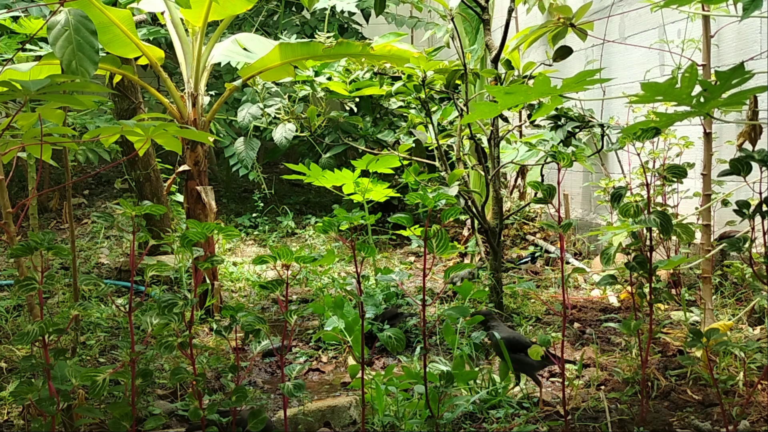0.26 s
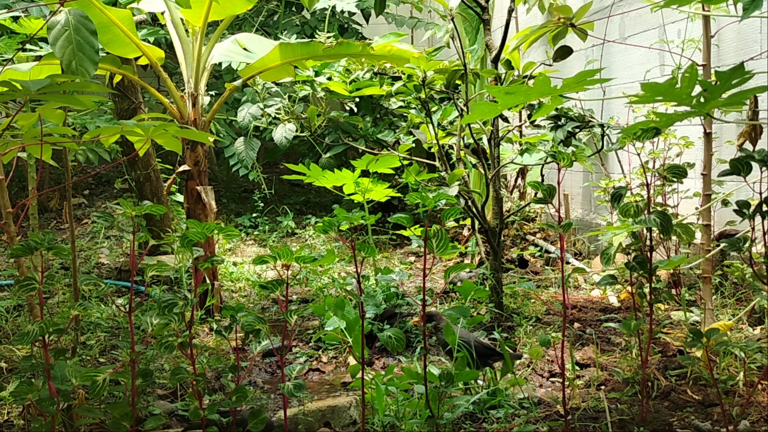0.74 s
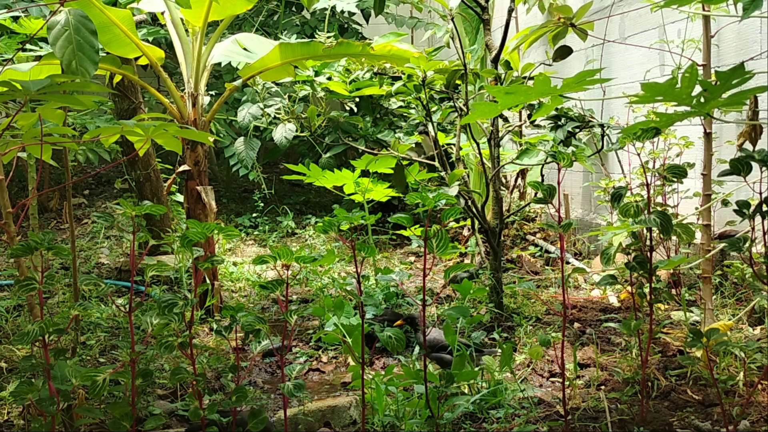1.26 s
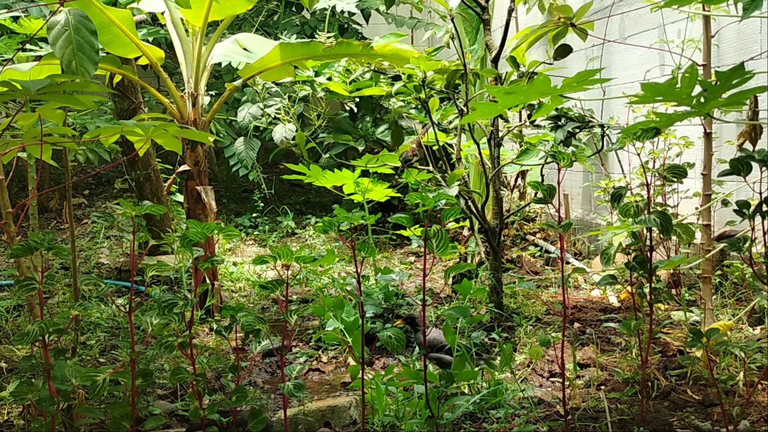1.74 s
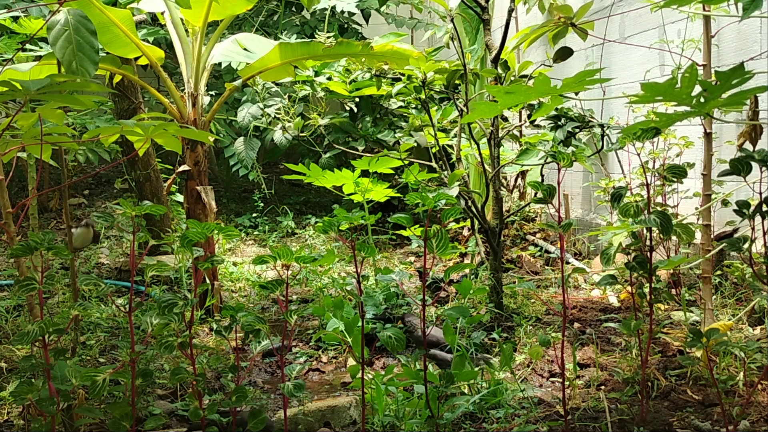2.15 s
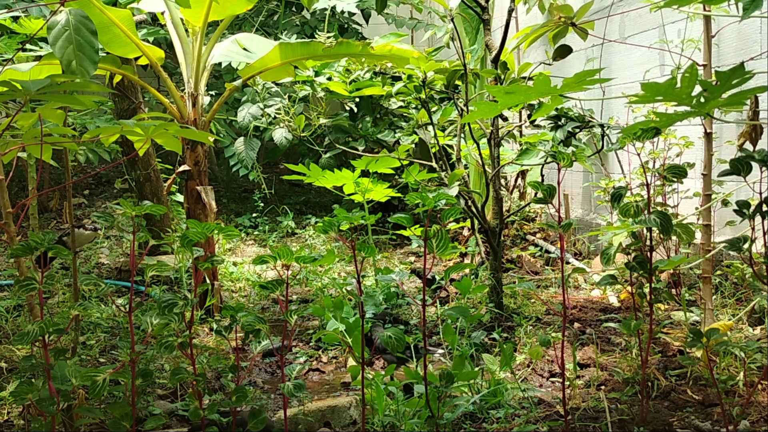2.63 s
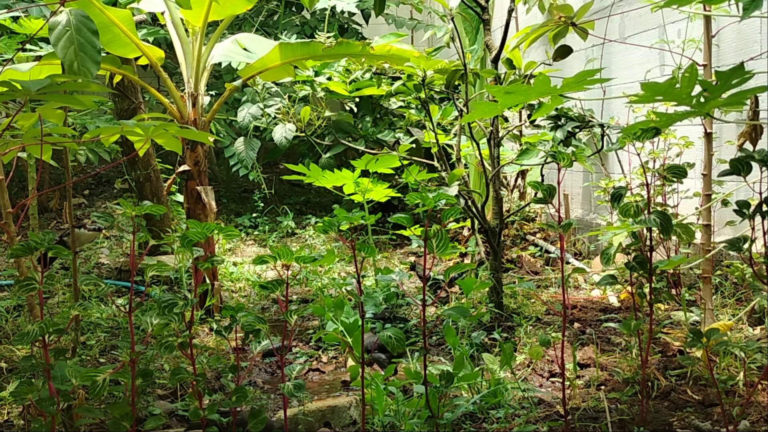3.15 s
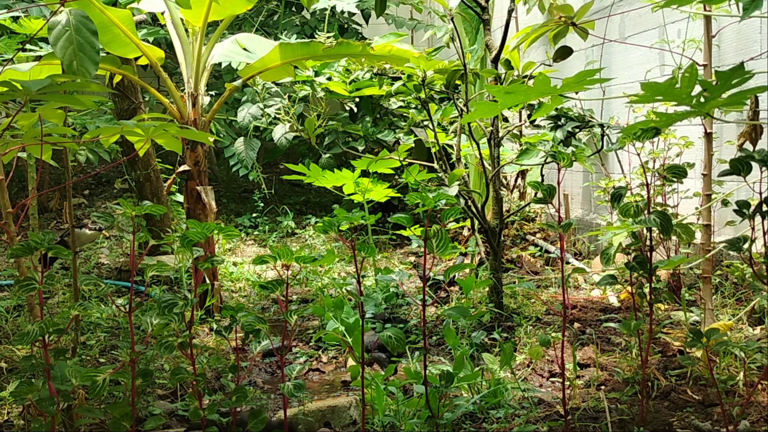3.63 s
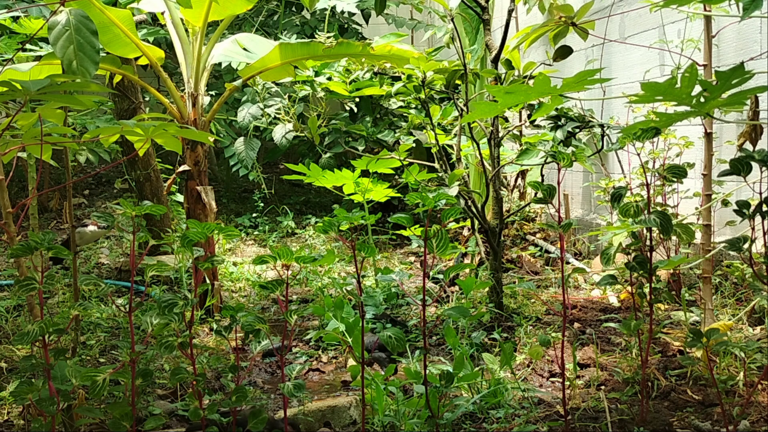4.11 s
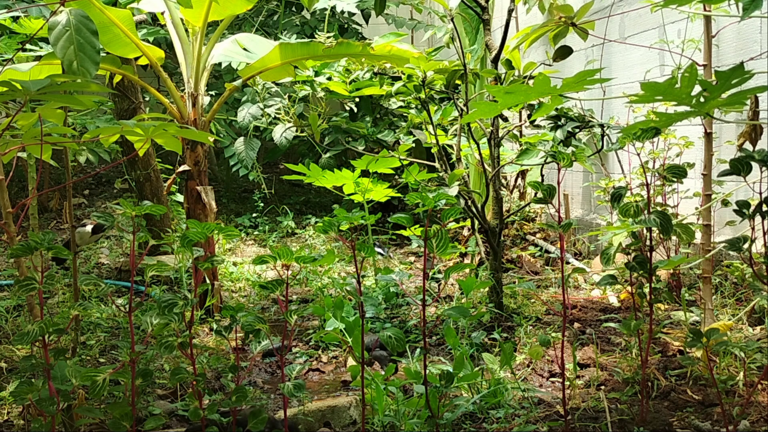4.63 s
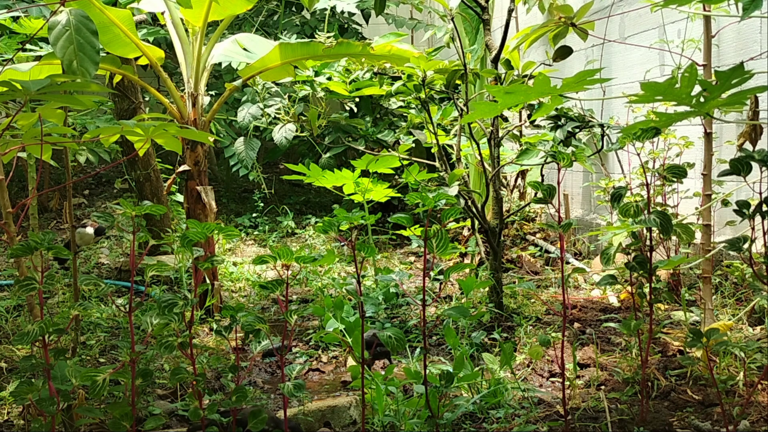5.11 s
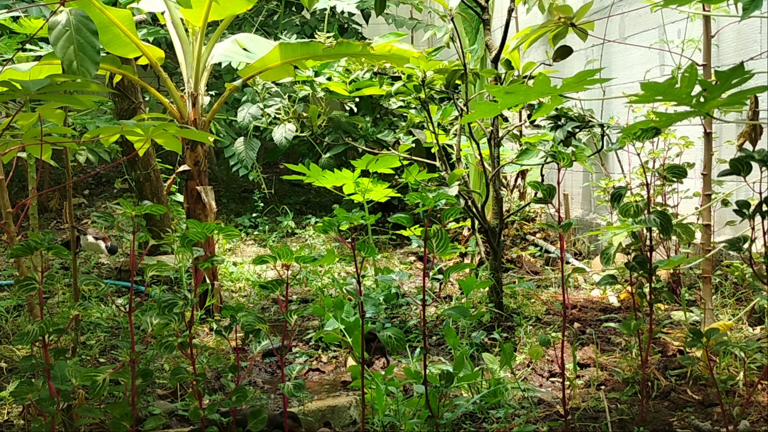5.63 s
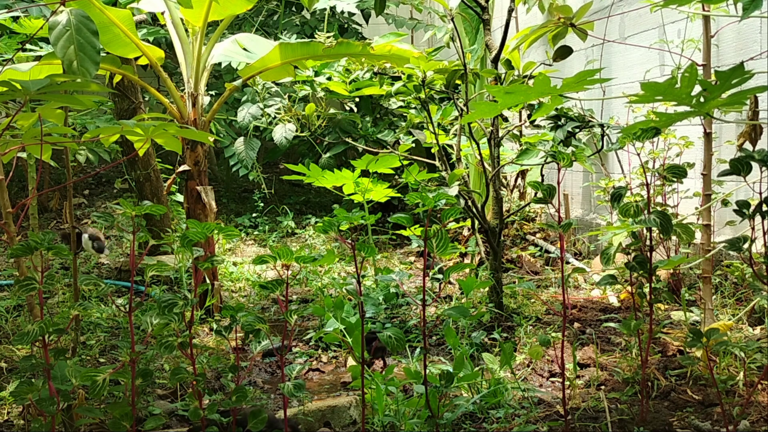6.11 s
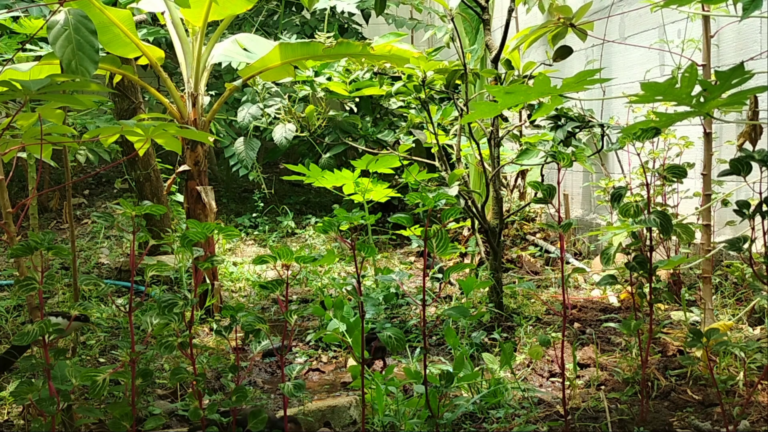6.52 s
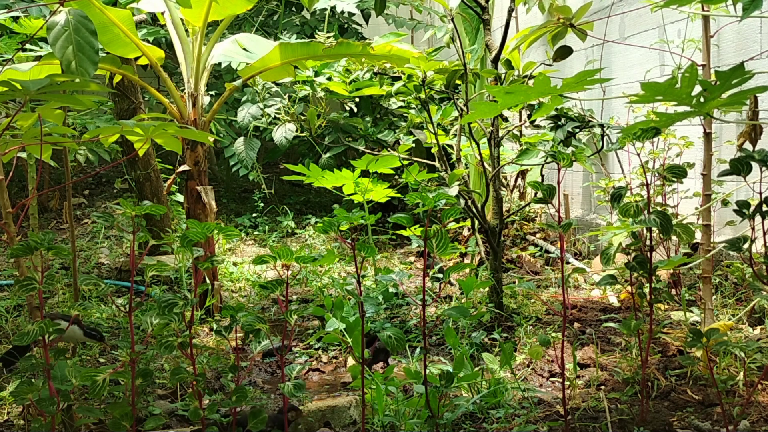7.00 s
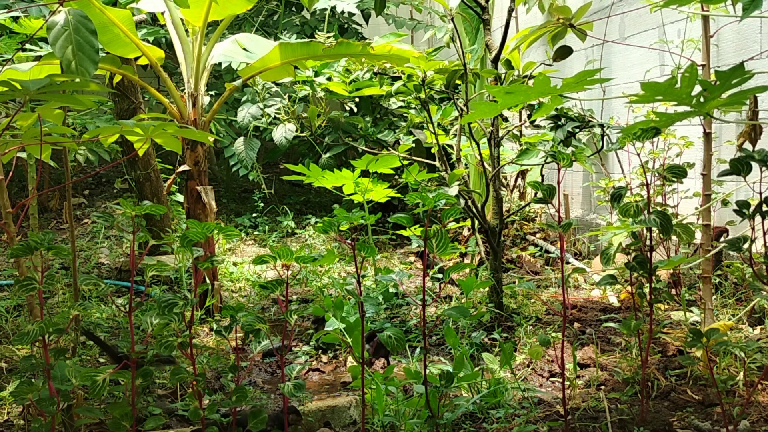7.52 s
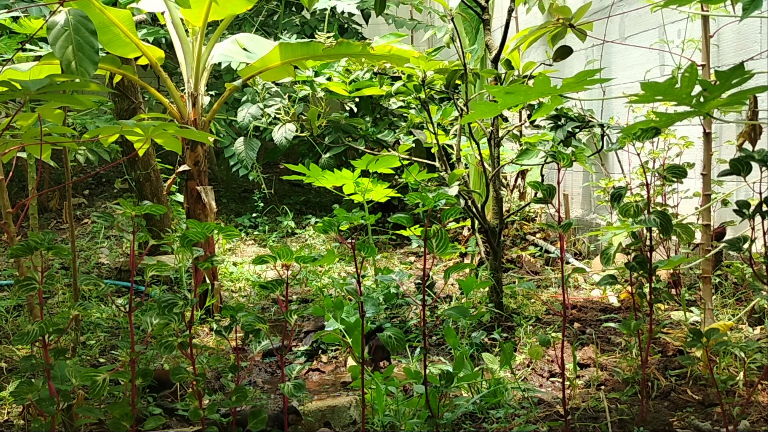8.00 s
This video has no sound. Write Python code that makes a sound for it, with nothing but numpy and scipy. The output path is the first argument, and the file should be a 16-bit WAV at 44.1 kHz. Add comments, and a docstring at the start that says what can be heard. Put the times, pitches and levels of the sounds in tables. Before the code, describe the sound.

A single microphone in a leafy walled garden hears steady, echoing metal blows from somewhere hidden. A quick far yelp opens, then dry leaves crackle and a nearby bird chirps. Two dull knocks sound further away, a low engine drone rises and falls, and a rough-voiced bird warbles, most strongly as the hammering stops. Three looser blows, rustling and a final short warble end it over faint air hiss.

```python
"""A leafy garden: hammering on metal, out of sight in a walled yard, arrives as washes of echo about twice a second.
A far animal yelps at once and again after two seconds; leaves rustle and a near bird chirps, then chirps softly.
From two seconds a hoarse bird warbles in bursts, two dull knocks come from further off and an engine drone swells.
The blows pause, then a few more follow, with late rustles and a last warble, all under the hiss of open air.
Blows are noise echoes ringing in metal modes; calls are gliding harmonics; leaves, traffic and air are shaped noise."""
import sys
import numpy as np
from scipy import signal
from scipy.fft import rfft, irfft
from scipy.io import wavfile

SR = 44100
rng = np.random.default_rng(int(sys.argv[2]) if len(sys.argv) > 2 else 0)


def pcm_store(signal):
    """Save signal as 16-bit PCM."""
    levels = np.round(np.clip(np.atleast_2d(signal), -1, 1) * 32767)
    wavfile.write(sys.argv[1], SR, levels.astype(np.int16).T)


N = 364266

# ringing modes of the struck metal: mode_hz, level_db (relative), t60_s (under a square blow)
METAL_MODES = [(611, -20, 0.33), (737, -13, 0.085), (873, -11.5, 0.075), (1142, -10, 0.06),
               (1314, -21, 0.15), (1397, -12, 0.094), (1496, -13.5, 0.12), (1702, -8.5, 0.087),
               (1832, -7, 0.079), (2004, -11.5, 0.097), (2196, -15, 0.09), (2366, -15, 0.063),
               (2526, -9, 0.033), (2540, -18, 0.072), (2830, -20.5, 0.065), (2810, -13, 0.055),
               (3050, -33.5, 0.12), (3186, -33, 0.088), (3420, -38, 0.09), (3700, -17, 0.071),
               (3730, -17, 0.08), (3930, -12, 0.046), (4207, -9.5, 0.028), (4400, -13, 0.031),
               (4620, -3, 0.089), (7300, -14.5, 0.096), (8420, -6, 0.0031), (13000, -25, 0.1)]


def from_db(db):
    """Gain of a level in dB."""
    return 10 ** (np.asarray(db) / 20)


def rms_one(x):
    """Scaled to an rms of 1."""
    return x / np.sqrt(np.mean(x ** 2) + 1e-20)


def in_time(rows, t):
    """Columns of a curve table, read at times t."""
    s, *columns = np.transpose(rows)
    return [np.interp(t, s, column) for column in columns]


def at_hz(points, hz):
    """A spectrum in dB, or a decay time, read on a log-frequency axis."""
    point_hz, values = np.array(points).T
    return np.interp(np.log(hz + 1), np.log(point_hz), values)


def coloured(x, spectrum, tilt_db=0):
    """x shaped by a spectrum and a tilt, in dB per octave in the treble, about 1.5 kHz; rms 1."""
    hz = np.fft.rfftfreq(len(x), 1 / SR)
    shape_db = at_hz(spectrum, hz) + tilt_db * np.log2((hz + 500) / 2000)
    return rms_one(irfft(rfft(x) * from_db(shape_db), len(x)))


def noise(spectrum, size):
    """White noise given a spectrum; rms 1."""
    return coloured(rng.standard_normal(size), spectrum)


def drift(rate_hz, size):
    """Slow random wander of rms 1: noise through two equal low-pass poles, after a second to settle."""
    r = np.exp(-2 * np.pi * rate_hz / SR)
    return rms_one(signal.lfilter([1], [1, -2 * r, r * r], rng.standard_normal(size + SR))[SR:])


def add(out, x, s):
    """Mix x into out from time s, which may lie before the start."""
    i = round(s * SR)
    x = x[max(-i, 0):N - i]
    out[max(i, 0):max(i, 0) + len(x)] += x


def hammer():
    """A hammer on metal: a broad crack plus ringing modes, heard only by way of the yard's echoes."""
    # blows: start_s, level_db, changes near 1.69, 1.85, 2.0 and 4.6 kHz: ring_1_db to ring_4_db,
    # clang near 2.5 and 3.6 kHz: mid_db, high_db, two favoured modes: mode_1_hz, mode_2_hz, their lift_db,
    # edge (0 square, 1 right on the edge), tilt_db_per_octave, fade_db_per_s (beyond the yard's decay)
    blows = [(0.0, -53, 2, 1, -6, -6, -9, -5.5, 3400, 2900, 5, 0.045, -2, 9),
             (0.447, -51, 5, -3, 11, -4, -3.5, -4, 2170, 3700, 8.8, 0.011, -2, 6),
             (0.876, -50.5, -1, -16, 15, -22, -7.5, -2, 3700, 4390, 3.9, 0, 1.5, -18.5),
             (1.333, -49, 10, -18, -6, -8, -4.5, 2.7, 3400, 3580, 10, 0.093, -1, 6.5),
             (1.791, -50.5, -14, 10.5, -1, -10, -5, -1, 3700, 3230, 6.6, 0.059, 0.6, -3),
             (2.24, -50.5, 11, 12.5, 10, 4.5, 0.5, 5.5, 3580, 3940, 8, 0.79, 0.1, 4),
             (2.73, -48, -16, -1, 8.5, -8, -6.5, -2.3, 3080, 2360, 13, 0.083, 0.3, -7.5),
             (3.216, -50, 9.5, -5, 7, -14, -8.5, -0.2, 3580, 3080, 8, 0, 1.1, -2),
             (3.702, -50.5, -5, 15.5, -9, -3, -2.5, 2.5, 2840, 3700, 8, 0.22, 0.6, -16.5),
             (4.151, -50, 12, 10.5, -10, -16, -5, 1.5, 3580, 2520, 8, 0.11, 1.2, 10),
             (4.615, -50, 13.5, 8.5, 8, -5.5, -5, 6, 3230, 3940, 6.2, 0.43, 0, 2),
             (6.234, -54, 14, -31, -12, -9, 1.5, -7.5, 2900, 2170, 11, 0.00089, 2, 3),
             (6.618, -50.5, 12.5, 5, -8, -16, -2.5, -0.5, 3940, 2360, 6.8, 0.099, 1.7, 16),
             (7.066, -53, 4.5, -20, -15, -3, -3, -0.5, 3940, 2900, 7.5, 0, 2.9, 1),
             (7.989, -58, -7, 2, -6, 2.5, 6, -14, 2360, 2840, 4, 0.02, 7, 48)]
    # colour of the crack: freq_hz, level_db (relative)
    crack_colour = [(210, -43), (350, -29), (506, -30.5), (754, -6.5), (990, -8), (1140, -16), (1240, -9),
                    (1550, -4.5), (1750, 0.5), (2500, -8.5), (3500, -5.5), (5660, -19.5), (8570, -24),
                    (11300, -36.5), (16000, -24.5)]
    thud_db, ring_db, clang_db = 5.5, -3.5, -1.5  # groups of modes under a square blow
    edge_thud_db, edge_clang_db, edge_sizzle_db = -43, -15.5, -18  # change for a blow right on the edge
    edge_longer = 1.7  # added share of the highest rings' length, right on the edge
    crack_follows = 0.47  # share of a clang's change that the crack takes on
    out, hz = np.zeros(N), np.array(METAL_MODES)[:, 0]
    # each mode belongs to the first group that fits; the rest belong to the high clang
    groups = [hz < 1250, hz < 1600, hz < 1780, hz < 1910, hz < 2080, abs(hz - 4625) < 200, hz < 2920]
    for s, db, *rings_db, mid_db, high_db, hz1, hz2, lift_db, edge, tilt_db, fade_db in blows:
        echoes = yard(rise_s=0.0021, wall_s=.008)
        group_db = [thud_db + edge * edge_thud_db, ring_db, *rings_db, clang_db + mid_db]
        levels_db = np.select(groups, group_db, clang_db + high_db + edge * edge_clang_db)
        levels_db = levels_db + rng.normal(0, 3.2, len(hz))
        favoured = [np.argmin(abs(hz - hz1)), np.argmin(abs(hz - hz2))]
        levels_db[favoured] += lift_db
        crack = []
        for f, level_db in crack_colour:
            clang_change_db = mid_db * (2000 < f < 3000) + high_db * (3000 < f < 5000)
            sizzle_db = edge * edge_sizzle_db * (f > 10000)
            crack.append((f, level_db + sizzle_db + crack_follows * clang_change_db))
        ringing = struck(echoes, levels_db, edge * edge_longer)
        blow = coloured(echoes, crack, tilt_db) + from_db(-11.0) * ringing
        fading = from_db(db - fade_db * np.arange(len(blow)) / SR)
        add(out, fading * blow, s)
    return out


def struck(echoes, levels_db, longer=0):
    """Echoes ringing in the metal: each mode is a decaying sine, brought to its own level."""
    spectrum, hz, out = rfft(echoes), np.fft.rfftfreq(len(echoes), 1 / SR), 0
    for (mode_hz, db, t60), more_db in zip(METAL_MODES, levels_db):
        decay = np.log(1000) / t60 / (1 + longer * (mode_hz > 4500))  # per s
        ringing = spectrum / (decay + 2j * np.pi * (hz - mode_hz))
        out = out + from_db(db + more_db) * ringing / np.linalg.norm(ringing)
    return irfft(out, len(echoes)) * len(echoes) / np.sqrt(2)


def yard(rise_s, wall_s=0.):
    """Echoes of walls and trees: noise builds up, 3 dB down until the nearest wall answers, then dies; energy 1."""
    # decay of the yard: freq_hz, t60_s
    yard_decay = [(400, 0.75), (1000, 0.66), (2800, 0.48), (7000, 0.51), (15000, 0.24)]
    t = np.arange(SR * 2 // 3) / SR
    white, hz = rfft(rng.standard_normal(len(t))), np.fft.rfftfreq(len(t), 1 / SR)
    octave = np.clip(np.log2(hz / 250 + 1e-9), 0, 6)  # above 250 Hz
    echoes = np.zeros(len(t))
    for k in range(7):
        band = irfft(white * np.clip(1 - abs(octave - k), 0, 1), len(t))  # bands overlap and sum to the whole
        echoes += band * from_db(-60 * t / at_hz(yard_decay, 250 * 2 ** k))
    echoes *= 1 - np.exp(-t / rise_s)
    echoes *= np.where(t < wall_s, from_db(-3.0), 1)
    echoes *= from_db(0.92 * drift(83, size=len(t)))
    return echoes / np.sqrt(np.sum(echoes ** 2))


def knocks():
    """Dull knocks further off: metal modes that grow weaker with pitch, in slower-rising echoes."""
    # knocks: start_s, level_db (rms over the whole tail)
    far_knocks = [(2.639, -66.5), (3.921, -70)]
    out, hz = np.zeros(N), np.array(METAL_MODES)[:, 0]
    dulled_db = -8.5 * np.log2(hz / 800)  # -8.5 dB per octave
    for s, db in far_knocks:
        add(out, from_db(db) * rms_one(struck(yard(rise_s=0.012), dulled_db)), s)
    return out


def warble():
    """A hoarse bird: short gliding notes of two harmonics, roughened by fast pitch flutter."""
    # notes: start_s, length_s, start_hz, end_hz, level_db (before throat and distance)
    notes = [(2.058, 0.026, 2850, 2890, -59), (2.095, 0.039, 2760, 2880, -51),
             (2.123, 0.028, 3240, 2900, -54), (2.142, .03, 2850, 2780, -52), (2.175, .035, 2490, 2500, -54),
             (3.478, 0.018, 2780, 2800, -51), (3.488, 0.017, 2600, 2200, -49),
             (3.509, 0.024, 3130, 3230, -49.5), (3.52, .024, 2830, 2850, -50),
             (3.548, 0.047, 2760, 2410, -51), (3.89, 0.035, 2295, 2450, -46), (3.921, .03, 2760, 2480, -49),
             (3.958, 0.035, 2575, 3030, -47), (3.978, .03, 2620, 2830, -45.5),
             (4.014, 0.058, 2820, 2520, -75), (5.153, 0.025, 2030, 2210, -54.5),
             (5.176, 0.018, 1905, 2500, -49), (5.194, 0.029, 2310, 1860, -54),
             (5.219, 0.029, 2270, 2570, -48.5), (5.239, 0.041, 3200, 2840, -50),
             (5.279, 0.048, 2610, 2474, -51), (5.468, 0.047, 2400, 1850, -52.5),
             (5.495, 0.031, 2500, 2850, -54.5), (5.518, 0.043, 2356, 1900, -46),
             (5.527, 0.027, 3270, 3050, -47), (5.563, 0.031, 2745, 2420, -41),
             (5.589, 0.0358, 2497, 2980, -41), (5.618, 0.053, 2900, 2505, -45),
             (5.685, 0.027, 2255, 2140, -48.5), (5.675, 0.034, 4030, 4800, -40),
             (5.697, .04, 4060, 4070, -49), (5.705, 0.04, 3140, 3370, -50),
             (5.742, 0.0322, 2970, 2297, -42), (5.768, .042, 3190, 2875, -42.5),
             (5.806, 0.032, 2554, 2485, -44), (5.83, 0.066, 2800, 2830, -65), (8.04, .11, 2560, 2450, -58),
             (8.154, .032, 1874, 2030, -52.5), (8.19, 0.028, 2540, 2410, -53),
             (8.222, .036, 2790, 2840, -59)]
    glides = [[(s, hz, db), (s + length, end_hz, db)] for s, length, hz, end_hz, db in notes]
    throat = [(3400, -6.5), (3800, -21), (5000, -27.5), (6000, -33)]  # Hz, dB
    return voice(glides, throat, count=2, hoarse=0.049, flutter_hz=230, breath_db=2.5,
                 dry_db=-5.0, wet_db=-3.0, fade_db=94)


def chirp():
    """A near bird: two chirps whose two harmonics follow a bending pitch, with little echo."""
    # near chirp: time_s, pitch_hz, level_db (before throat and distance)
    near_chirp = [(.36, 1784, -49), (.368, 1890, -48), (.3745, 2310, -48), (.379, 1860, -44),
                  (.384, 1865, -46), (.393, 1970, -54)]
    # softer chirp: time_s, pitch_hz, level_db (before throat and distance)
    soft_chirp = [(1.724, 1760, -65), (1.741, 2330, -56), (1.749, 2470, -58), (1.776, 2280, -65)]
    throat = [(2200, 5.0), (3700, 1.0), (4400, -6)]  # Hz, dB
    return voice([near_chirp, soft_chirp], throat, count=2, hoarse=0.025, flutter_hz=330, breath_db=2.5,
                 dry_db=-1.0, wet_db=-12.0, fade_db=152)


def yelps():
    """A far animal: six harmonics glide to a held pitch, coloured by the throat."""
    # yelps: start_s, length_s, start_hz, held_hz, level_db (at the held pitch, before throat and distance)
    far_yelps = [(.006, 0.024, 396, 404, -58), (0.028, 0.064, 403.7, 615, -38.5),
                 (0.09, 0.0346, 505, 606.6, -40), (2.135, 0.041, 595, 587, -57.5),
                 (2.188, 0.02, 590, 598, -53.5), (2.3, 0.21, 595, 600, -62)]
    # resonance of the throat: freq_hz, level_db (relative)
    throat = [(300, -45), (620, -38), (800, 0), (1150, -4.5), (1400, 0), (1650, 3.5), (1850, 7),
              (2400, -34), (3100, -20), (3800, -40)]
    glide_share, start_db, end_db = .66, -9.5, -2  # share of the length spent gliding; levels at the ends
    glides = []
    for s, length, start_hz, held_hz, db in far_yelps:
        glides.append([(s, start_hz, db + start_db), (s + glide_share * length, held_hz, db),
                       (s + length, held_hz, db + end_db)])
    return voice(glides, throat, count=6, hoarse=0.02, flutter_hz=70, breath_db=3.0,
                 dry_db=-2.0, wet_db=-8.5, fade_db=2)


def voice(tables, throat, count, hoarse, flutter_hz, breath_db, dry_db, wet_db, fade_db):
    """Harmonics of a fluttering pitch, their level wavering with the breath, with the yard's echoes behind."""
    out = np.zeros(N)
    for rows in tables:
        t = np.arange(rows[0][0], rows[-1][0], 1 / SR)
        hz, db = in_time(rows, t)
        flutter = rms_one(signal.detrend(drift(flutter_hz, size=len(t))))
        phase = 2 * np.pi * np.cumsum(hz * (1 + hoarse * flutter)) / SR
        edges = np.clip(np.minimum(t - t[0], t[-1] - t) / 0.0064, 0, 1)
        harmonics = sum(from_db(at_hz(throat, k * hz)) * np.sin(k * phase) for k in range(1, count + 1))
        breath = from_db(db + breath_db * drift(83, size=len(t)))
        add(out, breath * edges * harmonics, t[0])
    echoes = yard(rise_s=0.00048)
    echoes = echoes * from_db(-fade_db * np.arange(len(echoes)) / SR)  # foliage shortens the tail, dB per s
    wet = signal.fftconvolve(out, echoes / np.linalg.norm(echoes))[:N]
    return from_db(dry_db) * out + from_db(wet_db) * wet


def rustles():
    """Birds hopping in dry leaves: noise bursts with a snap in front; the foliage stirs and snaps faintly between."""
    # rustles: start_s, level_db (after the snap), twig_db (woody part below 5 kHz), bite_db (near 4 kHz),
    # snap_height (over the burst, as a ratio), t60_s
    hops = [(0.166, -66, -6, 0.1, 1.5, .05), (0.2328, -62, 8, 0.5, 1.4, 0.041),
            (0.314, -58, 1, -5, 2.4, 0.09), (0.364, -51.5, 4.5, -4, 0.5, 0.3),
            (0.636, -50.5, 2, -0.5, 0.91, .16), (0.787, -66.5, 1, 0.1, 2.4, 0.045),
            (0.814, -62, 7, -3, 2.2, .06), (1.508, -60, 8, 2, 2.4, .08), (2.021, -66, 3, 0.1, 2.4, .05),
            (4.0866, -76, -18, 0.1, 2.4, .05), (4.7358, -56.5, 3, 0.1, 2.4, .11),
            (5.707, -63, 9, 3, 2.4, .05), (6.379, -55.5, -7, 0.1, 0.1, .13),
            (6.393, -54.5, -1, 1, 0.1, 0.28), (7.396, -63.5, -8, 0.1, 2.4, 0.11),
            (7.7737, -58, 6, -3, 3.6, 0.12), (8.118, -51.5, 1, 7.5, 2.4, 0.1),
            (8.1886, -60, 2, -3, 1.2, .07), (8.234, -57.5, 3, 0, 3.6, 0.046)]
    # colour of dry leaves: freq_hz, level_db (relative)
    leaf_colour = [(300, -62), (1200, -2), (2600, -3), (4000, 0.5), (6300, -11.5), (8600, -0.5),
                   (11500, -15.5), (14000, -15), (15700, -6)]
    # stirring foliage: time_s, level_db
    stirring = [(0, -64.5), (.35, -65), (.7, -76), (1.08, -57), (1.25, -87), (1.55, -65.5), (1.7, -87),
                (1.95, -68), (2.2, -77), (2.7, -85), (7.2, -80), (7.9, -81.5), (8.26, -64)]
    hold_s = 0.0082  # before a burst fades
    twig_dulls = .5  # dB of top lost per dB of woody low part
    snaps_per_s, snap_db, snap_t60_s = 24, 8.5, 0.037  # faint snaps: rate, greatest height over the stir, decay
    out, t = np.zeros(N), np.arange(SR // 3) / SR
    for s, db, twig_db, bite_db, height, t60 in hops:
        leaf = []
        for hz, level_db in leaf_colour:
            woody_db = twig_db * (hz < 5000) - twig_dulls * twig_db * (hz > 10000)
            leaf.append((hz, level_db + woody_db + bite_db * (3000 < hz < 5000)))
        snap = (1 + max(height, 0) * np.exp(-t / .001)) * np.minimum(t / .0003, 1)
        fading = from_db(0.6 * drift(390, size=len(t)) - 60 * np.maximum(t - hold_s, 0) / t60)
        add(out, from_db(db) * snap * fading * noise(leaf, len(t)), s)
    clicks = from_db(snap_db) * rng.random(N) * (rng.random(N) < snaps_per_s / SR)
    snaps = signal.lfilter([1], [1, -from_db(-60 / (snap_t60_s * SR))], clicks)
    stir_db = in_time(stirring, np.arange(N) / SR)[0] + 1.9 * drift(9.3, size=N)
    return out + from_db(stir_db) * (1 + snaps) * noise(leaf_colour, N)


def wavering_tone(hz, size):
    """An engine's sine, with pitch and level that wander slowly."""
    phase = 2 * np.pi * np.cumsum(hz * (1 + 0.0061 * drift(3.46, size))) / SR
    return np.sin(phase) * from_db(2.2 * drift(4.5, size))


def engines():
    """Distant traffic: a steady-pitched drone, passing firing tones, low rumble and the rush of tyres."""
    # main drone: time_s, level_db (peak, before its waver)
    drone_level = [(0.0, -73), (0.07, -72), (1.22, -76), (1.45, -61.5), (3.24, -70), (3.47, -49.5),
                   (3.54, -60), (3.8, -48), (4.07, -56.5), (4.32, -50.5), (4.71, -56.5), (4.76, -75),
                   (5.1, -61), (5.29, -78), (5.45, -57), (7.08, -63), (7.43, -70), (8.26, -53)]
    # rush of traffic: time_s, level_db
    rush_level = [(0, -59.5), (.4, -61), (1.3, -72), (2.4, -66.5), (2.8, -72), (3.1, -71.5), (4.0, -62),
                  (4.7, -73), (5.8, -61), (6.3, -78.5), (7.6, -71.5), (8.26, -65.5)]
    # firing tones that come and go: start_s, length_s, tone_hz, level_db (peak, before the waver)
    firing = [(-.6, 2.64, 223.3, -63.5), (-.3, 1.8, 155.3, -63), (1.3, 1.5, 95.2, -63),
              (1.9, 1.56, 186.4, -63), (2.0, 1.3, 122, -66), (3.35, 0.73, 69.5, -58),
              (3.4, 0.77, 106.2, -55), (4.0, 4, 202.8, -72.5), (5.8, 1.17, 296, -71),
              (7.2, 1.2, 73.9, -67.5)]
    # colour of the rumble: freq_hz, level_db (relative)
    rumble_colour = [(12, -57), (20, -19), (38, -16), (129, 1), (167, -2.5), (220, -6), (325, -22),
                     (450, -20), (580, -25.5), (990, -120)]
    # colour of the rush: freq_hz, level_db (relative)
    rush_colour = [(250, 0), (500, -3), (1000, -1), (1800, -11.5), (3500, -19), (6000, -27)]
    t = np.arange(N) / SR
    drone_db, rush_db = in_time(drone_level, t)[0], in_time(rush_level, t)[0]
    # the rumble takes on a share of the drone's swing
    rumble_db = -61.5 + 0.32 * (drone_db - drone_db.mean()) + 2.5 * drift(12.0, size=N)
    out = from_db(rumble_db) * noise(rumble_colour, N)
    out += from_db(drone_db) * wavering_tone(133.3, N)
    out += from_db(rush_db) * noise(rush_colour, N)
    for s, length, hz, db in firing:
        size = int(length * SR)
        add(out, from_db(db) * signal.windows.tukey(size, .4) * wavering_tone(hz, size), s)
    return out


def open_air():
    """Hiss of the open air: shaped noise whose level drifts slightly."""
    # colour of the air: freq_hz, level_db (relative)
    air_colour = [(150, -6), (250, 4.5), (373, -5), (674, -8), (1010, -10), (1950, -14), (2710, -18.5),
                  (3400, -18), (6470, -33), (8550, -26.5), (11300, -41.5), (15200, -37), (16000, -31)]
    return from_db(-67.5 + .5 * drift(0.37, size=N)) * noise(air_colour, N)


def scene():
    """Everything at one microphone in the garden."""
    birds_and_animal = warble() + chirp() + yelps()
    return (hammer() + knocks() + birds_and_animal + rustles() + engines() + open_air())[None]


def record(dry):
    """The microphone loses the deepest bass, below 42 Hz; the top is cut steeply by 16150 Hz."""
    thin = signal.sosfilt(signal.butter(2, 42, "high", fs=SR, output="sos"), dry)
    return signal.sosfilt(signal.cheby2(24, 45, 16150, fs=SR, output="sos"), thin)


dry = scene()
out = record(dry)
pcm_store(out)
```